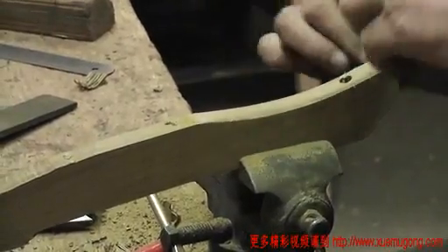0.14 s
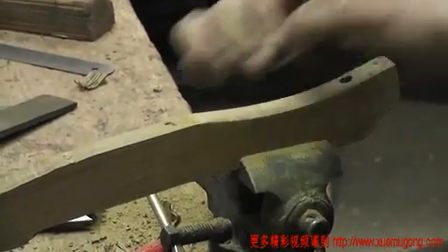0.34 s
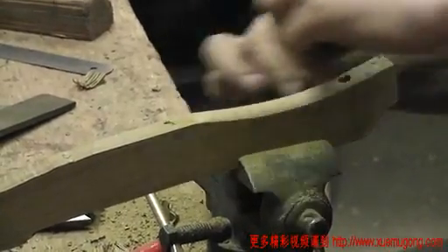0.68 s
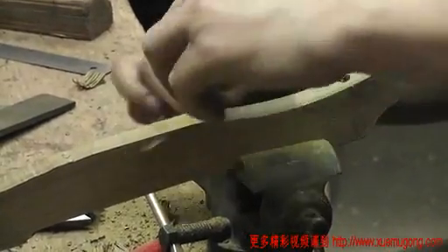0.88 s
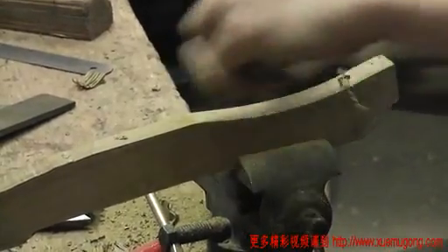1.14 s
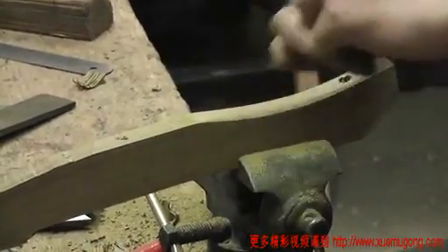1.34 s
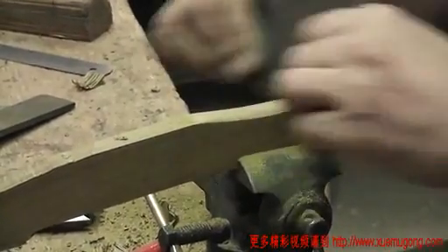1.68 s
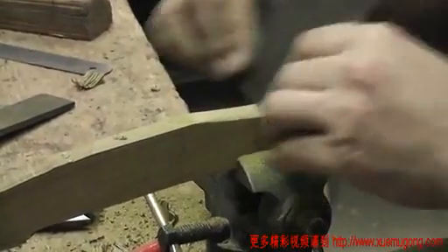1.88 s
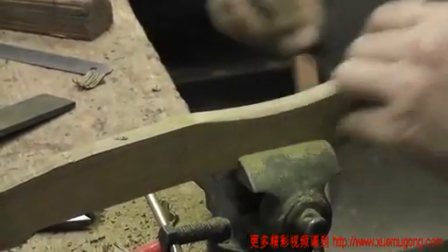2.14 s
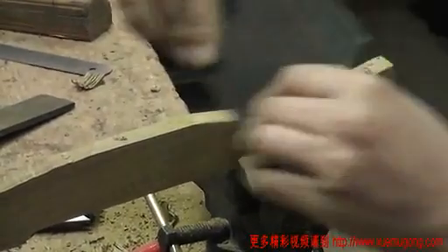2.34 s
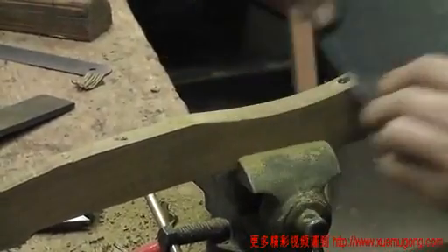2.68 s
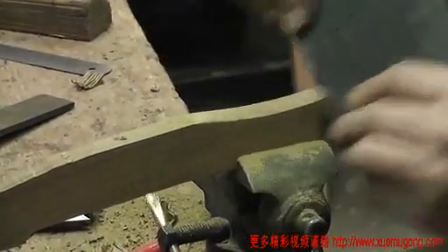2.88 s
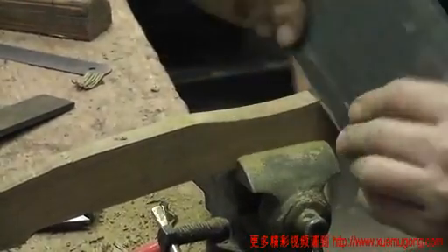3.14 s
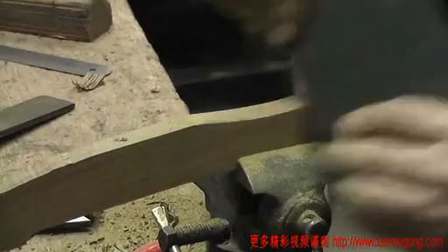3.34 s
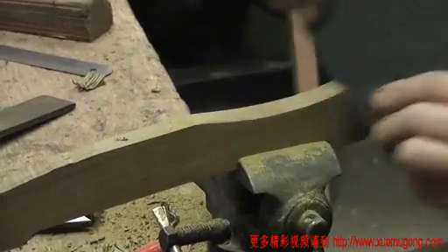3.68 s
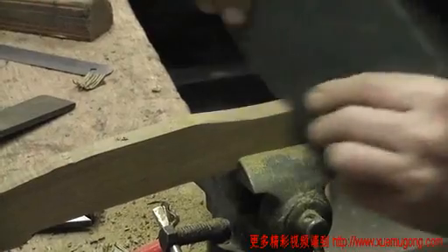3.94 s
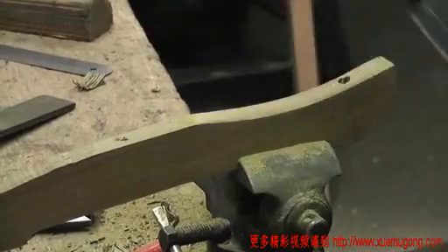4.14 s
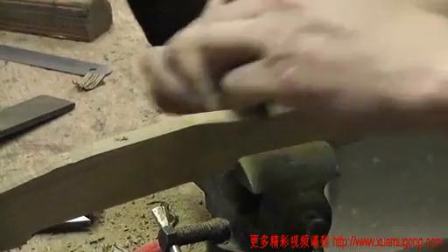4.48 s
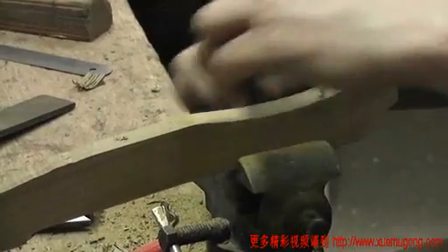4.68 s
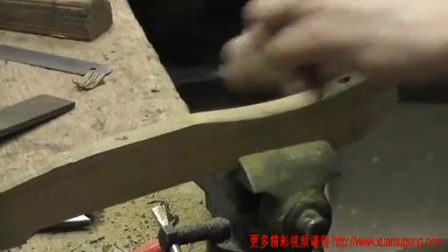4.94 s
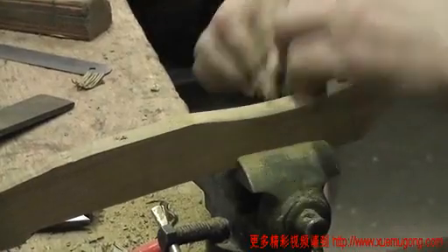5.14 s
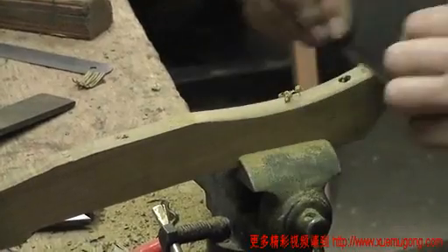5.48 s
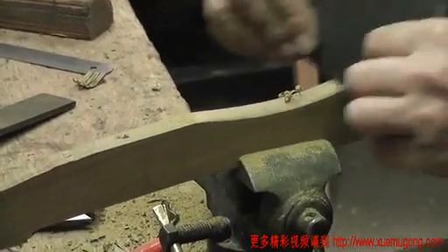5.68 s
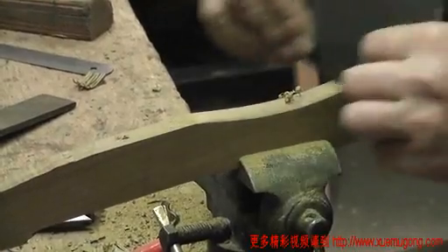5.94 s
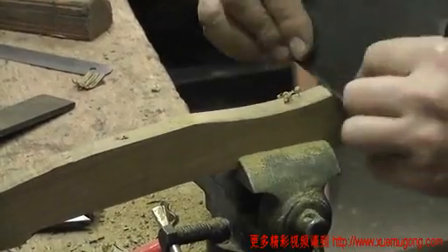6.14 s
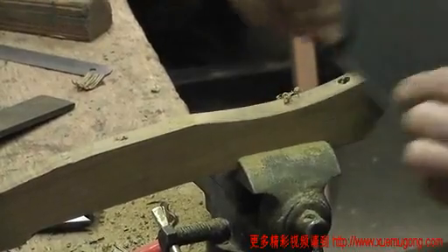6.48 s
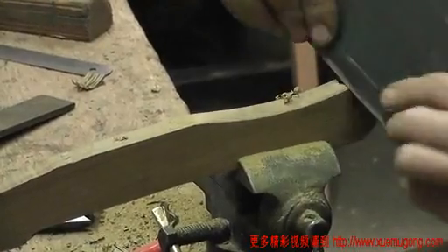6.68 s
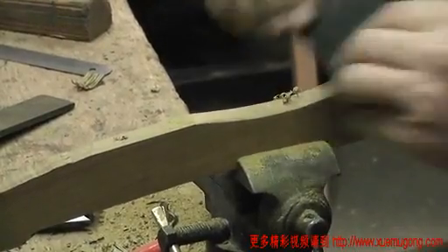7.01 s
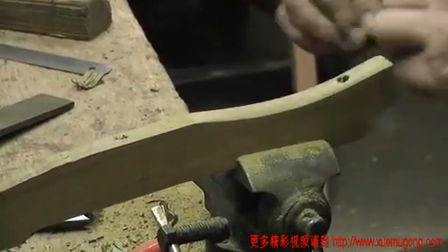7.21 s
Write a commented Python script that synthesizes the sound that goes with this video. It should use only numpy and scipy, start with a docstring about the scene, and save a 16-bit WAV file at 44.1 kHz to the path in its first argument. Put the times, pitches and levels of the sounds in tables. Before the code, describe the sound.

A steel scraper works wood in quick back-and-forth strokes: woody knocks and shuddering chatter, then dry bright hisses, close up in a small workshop.

```python
"""A steel scraper works along a curved piece of wood held in a vice, close by in a small workshop.
Pushed, the blade chatters and the wood shudders; pulled, it cuts with a dry hiss of tearing fibres.
Shaped random fibre breaks excite blade and wood modes; blows ring the wood under a noise clack.
Blade-coloured noise cracks, short pops, decaying bench sines and a noise murmur of air complete it.
The bench scatters the work to two microphones; the room briefly answers its thumps."""
import sys
import numpy as np
from scipy import signal
from scipy.fft import rfft, irfft, next_fast_len
from scipy.io import wavfile
from scipy.ndimage import uniform_filter1d, map_coordinates

SR = 44100
rng = np.random.default_rng(int(sys.argv[2]) if len(sys.argv) > 2 else 0)


def waveform_to_disk(signal):
    """Save audio, clipped to [-1, 1], as 16-bit WAV at the path in sys.argv[1]."""
    frames = np.transpose(np.atleast_2d(signal))
    scaled = np.clip(frames, -1, 1) * 32767
    samples = np.round(scaled).astype(np.int16)
    wavfile.write(sys.argv[1], SR, samples)


N = 323253  # samples

# blade pushed forward:
# start_s, rise_s, hold_s, shudder_db, chatter_db, grind_db, favoured_mode_hz
PUSH_STROKES = [ (0.0, 0.035, 0.056, -24, -30.5, -31.5, 354), (0.404, 0.0083, 0.063, -12, -22, -30.5, 280),
                (0.776, 0.019, 0.059, -15.5, -14.5, -21.5, 322),
                (1.163, 0.0029, 0.055, -16, -20.5, -33, 265), (1.567, .003, 0.071, -21, -30, -37.5, 237),
                (1.839, 0.031, 0.04, -24.5, -27.5, -27, 370), (2.118, 0.044, 0.11, -20, -24.5, -24, 353),
                (2.209, 0.021, 0.044, -15, -22, -26, 337), (2.502, 0.028, 0.073, -23.5, -31, -30, 315),
                (2.848, 0.0067, 0.022, -24.5, -35, -32, 360), (3.113, 0.003, 0.022, -12.5, -35, -30, 367),
                (3.382, 0.011, 0.12, -17.5, -26.5, -30.5, 214),
                (3.862, 0.0033, 0.063, -26, -35.5, -47, 223),
                (4.355, 0.012, 0.071, -12.5, -23.5, -31.5, 274),
                (4.722, 0.0079, 0.074, -20, -27.5, -37, 238), (5.139, 0.011, 0.027, -15, -18, -32, 390),
                (5.365, .004, 0.068, -24.5, -31, -32, 376), (5.575, 0.046, 0.039, -22.5, -34, -23.5, 400),
                (5.807, 0.06, 0.022, -17, -25, -20.5, 400), (6.039, 0.033, 0.038, -20, -31, -22.5, 390),
                (6.409, 0.0024, 0.024, -12, -29, -46, 400), ]
# blade pulled back, cutting:
# start_s, rise_s, hold_s, fade_db_per_s, hiss_db, rasp_db, rumble_db
PULL_STROKES = [ (0.083, 0.027, 0.014, 205, -29.5, -27, -32), (0.499, 0.019, 0.095, 240, -21, -25.5, -39.5),
                (.865, 0.022, 0.074, 234, -21.5, -26, -39.5), (1.218, 0.043, .1, 294, -22.5, -25.5, -38),
                (1.643, 0.0066, 0.067, 186, -21, -26.5, -37.5), (1.924, 0.041, 0.038, 187, -20, -26, -33.5),
                (2.294, 0.0053, 0.034, 175, -20, -28, -49), (2.598, 0.0059, 0.12, 260, -20, -24.5, -41.5),
                (2.9, 0.044, .033, 275, -23, -22.5, -33), (3.161, 0.0091, 0.038, 270, -24, -24, -33),
                (3.531, 0.044, 0.074, 233, -20.5, -24, -43), (3.92, 0.026, 0.09, 450, -19.5, -25.5, -34),
                (4.069, .005, 0.091, 174, -35, -36, -32.5), (4.444, 0.05, 0.078, 270, -22, -27, -38),
                (4.799, 0.045, 0.1, 203, -20.5, -25.5, -36.5), (5.189, 0.011, 0.051, 287, -21, -27, -36),
                (5.456, 0.0087, 0.038, 240, -22.5, -24.5, -33.5), (5.676, 0.017, 0.014, 205, -26, -25, -31),
                (5.906, 0.017, 0.049, 248, -24.5, -25, -31), (6.134, 0.059, 0.044, 395, -24, -22, -31),
                (6.278, .005, 0.07, 157, -35.5, -36.5, -32.5), (6.462, 0.0072, 0.058, 235, -21.5, -24, -27),
                (6.6, 0.0046, .05, 150, -34.5, -36, -32.5), (6.739, 0.019, 0.015, 254, -19.5, -24, -28),
                (6.852, .005, 0.032, 200, -34.5, -34.5, -36),
                (7.052, 0.0073, 0.069, 260, -19.5, -26, -31.5), ]
# blade landing on the wood: start_s, level_db, tick_relative_db, favoured_mode_hz
BLADE_KNOCKS = [(.389, 2.5, -8, 593), (0.766, -17, 7.5, 900), (0.774, -23, -12, 750), (1.154, 0.5, -9, 750),
                (1.191, -25, -24, 300), (1.561, -8.5, -52, 293), (1.836, -13.5, -22, 450),
                (2.22, -18, -25, 500), (2.241, -9, -8, 282), (2.498, -38, -4, 550), (2.841, -25.5, 5, 550),
                (3.103, -7.5, 2.5, 644), (3.378, -7.5, -10, 330), (3.852, -16, -8, 330),
                (4.05, -12, -21, 544), (4.344, 2.5, -16, 504), (4.373, -8, -28, 320),
                (4.718, -1.5, -32, 382), (4.752, -9.5, -25, 242), (5.132, 2.5, -17, 800),
                (5.362, -6.5, -18, 477), (6.402, 2, -8, 640), (6.42, -24, -26, 382), (6.706, 0.5, -6, 650),
                (7.028, -3.5, -7.5, 590)]
# edge snapping through a hard fibre: start_s, level_db
FIBRE_SNAPS = [(2.937, -5), (3.987, -25), (4.044, -4.5), (6.234, -4.5), (6.53, -11)]
# short low pop, opposite at the two microphones: start_s, peak_db
LOW_POPS = [(3.581, -12), (6.2355, -6)]
# hands nudging the bench: start_s, level_db, pitch_hz
BENCH_NUDGES = [(3.611, -31, 50.3), (4.1, -29, 112), (4.216, -35, 122), (6.264, -28, 143),
                (6.831, -22, 218)]
# modes of the clamped wood: mode_hz, gain_db, t60_s
WOOD_MODES = [(82.8, -3.5, 0.31), (127, -5, 0.19), (165.6, -1, 0.24), (226.9, 2, 0.1), (277, -3, 0.08),
              (337.6, -4.5, 0.26), (380.5, 1.5, 0.13), (452.7, -5.5, 0.14), (527, -4, 0.11),
              (616, 2, 0.064), (784, -20.5, 0.0097), (753, -6, 0.13), (1073, -10, 0.085), (1250, -22, 0.19)]
# modes of the hand-damped steel plate: mode_hz, width_hz, gain_db
BLADE_MODES = [(1738, 32, 1.5), (1986, 34, 4), (2167, 17, 3), (2820, 16, -0.5), (3440, 17, 7),
               (3780, 40, 1.5), (7050, 120, -27), (8500, 2100, -9), (11300, 540, -15)]
# fibre hiss spectrum: freq_hz, gain_db
HISS_SPECTRUM = [(2000, -34), (4000, -10), (5000, -5.5), (6200, -1.5), (7400, -5), (9000, -2), (10500, -4),
                 (12400, -2.5), (13500, -7.5), (15000, -14)]
# blade rasp spectrum: freq_hz, gain_db
RASP_SPECTRUM = [(400, -10.5), (900, -6.5), (1250, -4), (1600, 1), (2300, -0.5), (3000, 0), (4300, -4.5),
                 (5200, -13.5), (8000, -27)]
# bench rumble under a cutting blade: freq_hz, gain_db
RUMBLE_SPECTRUM = [(35, -34), (80, 6.5), (105, -11.5), (150, 6), (290, -6), (385, 4), (530, -4), (800, -6),
                   (1400, -23), (3000, -52)]
# hard chatter spectrum: freq_hz, gain_db
CHATTER_SPECTRUM = [(250, -35), (450, -10.5), (610, 3.5), (1050, -4.5), (1400, -22.5), (2200, -27),
                    (4000, -47)]
# back of the burr dragged over the wood: freq_hz, gain_db
GRIND_SPECTRUM = [(600, -52), (1100, 5.5), (1600, 4), (2250, 4.5), (2800, 4.5), (3400, 0), (4200, -3.5),
                  (5200, -13), (8000, -57)]
# steel clack spectrum: freq_hz, gain_db
CLACK_SPECTRUM = [(200, -29), (700, 10), (3200, 0), (5500, -9), (9000, -11.5), (15000, -20)]
# room air spectrum: freq_hz, gain_db
AIR_SPECTRUM = [(20, -41), (50, -17), (82, -3.5), (110, -2.5), (150, -0.5), (450, -2), (700, -10.5),
                (1700, -12), (5000, -22.5), (7000, -26.5), (15000, -32)]
# workshop decay: freq_hz, t60_s
ROOM_DECAY = [(150, 0.033), (1000, 0.49), (5000, 0.024), (14000, 0.9)]
# difference between the two microphones: freq_hz, side_db
SIDE_SPECTRUM = [(60, -12), (250, -14.5), (1000, -11), (2200, -19), (3800, -22), (6000, -16), (14000, -18)]

BITE_S, CUT_IN_S = 0.009, 0.015  # time for the edge to take hold: push, pull
PULL_S = 0.29  # whole pull, CUT_IN_S included
# the hand speeds up into a stroke and eases off
PULL_SWELL_DB_PER_S, PUSH_SWELL_DB_PER_S = 171, 216
HISS_SAG_DB_PER_S, RASP_SAG_DB_PER_S, RUMBLE_SAG_DB_PER_S = 35, 20, 44
# drop over a push's hold as the blade slows
SHUDDER_DROP_DB, CHATTER_DROP_DB, GRIND_DROP_DB = 5, 11.5, 11
# after a push the wood rings on while the blade falls quiet
SHUDDER_FADE_DB_PER_S, BLADE_FADE_DB_PER_S = 300, 500
RASP_LINGER, RUMBLE_LINGER = 0.79, 0.31  # fade rates as a share of the hiss's
PUSH_DRIFT_DB, PULL_DRIFT_DB, SNAP_DRIFT_DB = 2.5, 3.0, 6  # drift of the blade's colour
CLACK_DB, CLACK_T60_S = -11.5, 0.16
POP_S = 0.0012  # time scale of push and rebound
ROOM_DB = -15.5
TOP_HZ = 15050


def amp(db):
    """Decibels to gain."""
    return 10 ** (np.asarray(db) / 20)


def unit(x):
    """Scales to rms 1."""
    return x / np.sqrt(np.mean(x ** 2) + 1e-20)


def along(points, hz):
    """Reads (freq_hz, value) points on a log frequency axis."""
    point_hz, value = np.transpose(points)
    return np.interp(np.log(hz + 1), np.log(point_hz), value)


def wobble(rate_hz, size):
    """Smooth random curve with rate_hz knots a second."""
    knots = rng.standard_normal(int(size * rate_hz / SR) + 4)
    return map_coordinates(knots, [np.arange(size) * rate_hz / SR])


def filtered(x, response):
    """Multiplies the spectrum by a response of frequency."""
    n = x.shape[-1]
    padded = next_fast_len(n + SR // 16)
    spectrum = rfft(x, padded) * response(np.fft.rfftfreq(padded, 1 / SR))
    return irfft(spectrum, padded)[..., :n]


def coloured(x, spectrum):
    """Shapes x by a spectrum, at rms 1."""
    return unit(filtered(x, lambda hz: amp(along(spectrum, hz))))


def evened(x, span_s):
    """Holds x near rms 1 over each span."""
    power = np.abs(uniform_filter1d(x ** 2, int(span_s * SR)))
    return x / np.sqrt(power + 1e-9)


def high_passed(x, corner_hz):
    """Removes the sound below the corner."""
    return signal.sosfilt(signal.butter(2, corner_hz, 'high', fs=SR, output='sos'), x)


def add(track, start_s, x):
    """Mixes x into the track."""
    start = max(round(start_s * SR), 0)
    part = track[start:start + len(x)]
    part += x[:len(part)]


def stroke(t, contact_s, rise_s, hold_s, swell, sag, fade):
    """Stroke gain: the edge takes hold, swells, sags while held, fades (slopes in dB per s)."""
    db = -swell * np.maximum(rise_s - t, 0)
    db -= sag * np.clip(t - rise_s, 0, hold_s)
    db -= fade * np.maximum(t - rise_s - hold_s, 0)
    take_hold = np.clip(1 + t / contact_s, 0, 1)
    let_go = np.clip((t[-1] - t) / contact_s, 0, 1)
    return amp(db) * take_hold * let_go


def fibres(size, rate_hz, spread_db):
    """Tiny fibre breaks at random times, of random sign and uneven strength."""
    breaks = rng.random(size) < rate_hz / SR
    signs = rng.choice([-1, 1], size)
    return breaks * signs * amp(spread_db * rng.standard_normal(size))


def through_blade(x, ring_db, flex, patchy_db):
    """Plate modes, shifted by each new grip; colour drifts as the contact point travels."""
    grip = rng.standard_normal((len(BLADE_MODES), 2))
    modes = [(hz * (1 + flex * shift), width_hz, amp(db + ring_db + 2 * weight))
             for (hz, width_hz, db), (shift, weight) in zip(BLADE_MODES, grip)]

    def response(hz):
        """Direct scrape plus its resonances."""
        return 1 + sum(g * 1j * hz * w / (f * f - hz * hz + 1j * hz * w) for f, w, g in modes)

    ringing = filtered(x, response)
    z = signal.stft(np.pad(ringing, (0, 1024)), nperseg=1024)[2]
    drift = uniform_filter1d(rng.standard_normal(z.shape), size=5, axis=0)
    drift = uniform_filter1d(drift, size=7, axis=1)
    return signal.istft(z * amp(patchy_db * unit(drift)), nperseg=1024)[1][:len(x)]


def wood_ring(centre_hz, focus, detune, vary_db):
    """Wood modes after one blow; contact place and hardness favour those near centre_hz."""
    t = np.arange(SR // 5) / SR
    hz, db, t60_s = np.transpose(WOOD_MODES)[:, :, None]
    shift, weight = rng.standard_normal((2, len(WOOD_MODES), 1))
    nearness = 1 / np.sqrt(1 + (focus * (hz / centre_hz - centre_hz / hz)) ** 2)
    gain = amp(db + vary_db * weight) * nearness
    phase = rng.uniform(0, 2 * np.pi, hz.shape)  # each mode has its own path to the air
    tones = np.sin(2 * np.pi * hz * (1 + detune * shift) * t - phase)
    ring = np.sum(gain * amp(-60 * t / t60_s) * tones, axis=0)
    ring = high_passed(ring * (1 - np.exp(-t / 0.00055)), corner_hz=121)
    return ring / np.abs(ring).max()


def shaken(size, centre_hz, focus):
    """Wood modes kept ringing by small irregular slips, at a held level."""
    lead = SR // 10
    slips = fibres(size + lead, rate_hz=700, spread_db=3.0)
    ringing = signal.fftconvolve(slips, wood_ring(centre_hz, focus, detune=0.0062, vary_db=3.0))
    return evened(ringing[lead:lead + size], span_s=0.0262)


def pushes():
    """Against its burr the blade sticks and slips: chatter while fast, wood shudder as it slows."""
    out, n = np.zeros(N), SR // 5
    t = np.arange(n) / SR - BITE_S
    for start_s, rise_s, hold_s, shudder_db, chatter_db, grind_db, mode_hz in PUSH_STROKES:
        motion = (t, BITE_S, rise_s, hold_s, PUSH_SWELL_DB_PER_S)
        shudder = amp(shudder_db) * stroke(*motion, SHUDDER_DROP_DB / hold_s, SHUDDER_FADE_DB_PER_S)
        chatter = amp(chatter_db) * stroke(*motion, CHATTER_DROP_DB / hold_s, BLADE_FADE_DB_PER_S)
        grind = amp(grind_db) * stroke(*motion, GRIND_DROP_DB / hold_s, BLADE_FADE_DB_PER_S)
        hiss = amp(-12.0) * grind ** 0.64  # more pressure adds grind faster than hiss
        breaks = fibres(n, rate_hz=420, spread_db=4.0)
        judder = evened(coloured(breaks, CHATTER_SPECTRUM), span_s=0.0145)
        wood = shudder * shaken(n, mode_hz, focus=4.4) + chatter * judder
        grit = fibres(n, rate_hz=14000, spread_db=2.5) * amp(1.7 * wobble(460, n))
        steel = through_blade(grit, ring_db=1, flex=0.0084, patchy_db=PUSH_DRIFT_DB)
        scrape = grind * coloured(steel, GRIND_SPECTRUM) + hiss * coloured(steel, HISS_SPECTRUM)
        add(out, start_s - BITE_S, wood + scrape)
    return out


def bench_scatter(x):
    """Reflections off bench and tools reach the two microphones differently."""
    t = np.arange(SR // 40) / SR
    scatter = rng.standard_normal(len(t)) * amp(-60 * t / 0.06) * (t > 0.001)
    reflected = signal.fftconvolve(x, scatter / np.linalg.norm(scatter))[:N]
    side = filtered(reflected, lambda hz: amp(along(SIDE_SPECTRUM, hz)))
    return np.array([side, -side])


def workshop(x):
    """Short diffuse noise tail, different at each microphone, decaying by frequency."""
    hz, t, z = signal.stft(rng.standard_normal((2, SR // 2)), SR, nperseg=256)
    decay = amp(-60 * t / along(ROOM_DECAY, hz)[:, None])
    tail = signal.istft(z * decay, SR, nperseg=256)[1]
    delayed = np.pad(x, (SR // 300, 0))[None]
    return signal.fftconvolve(delayed, tail / np.linalg.norm(tail[0]), axes=1)[:, :N]


def room_tone():
    """Low steady murmur of air: shared noise plus noise opposite at the microphones."""
    mid = coloured(rng.standard_normal(N), AIR_SPECTRUM)
    side_spectrum = [(20, -12), (80, 5), (200, 13), (600, 17), (2000, 8), (15000, -94)]  # freq_hz, gain_db
    side = coloured(rng.standard_normal(N), side_spectrum)
    return amp(-41.5) * mid + amp(-51.0) * side * np.array([[1], [-1]])


def pulls():
    """The burr cuts: countless fibres tear, hiss, ring the blade and shake the wood."""
    out, n = np.zeros(N), round(PULL_S * SR)
    t = np.arange(n) / SR - CUT_IN_S
    for start_s, rise_s, hold_s, fade, hiss_db, rasp_db, rumble_db in PULL_STROKES:
        motion = (t, CUT_IN_S, rise_s, hold_s, PULL_SWELL_DB_PER_S)
        hiss = amp(hiss_db) * stroke(*motion, HISS_SAG_DB_PER_S, fade)
        rasp = amp(rasp_db) * stroke(*motion, RASP_SAG_DB_PER_S, RASP_LINGER * fade)
        rumble = amp(rumble_db) * stroke(*motion, RUMBLE_SAG_DB_PER_S, RUMBLE_LINGER * fade)
        unevenness_db = 1.1 * wobble(606.4, n) + 0.29 * wobble(79, n)
        tearing = fibres(n, rate_hz=24000, spread_db=1.0) * amp(unevenness_db)
        bright = through_blade(tearing, ring_db=4, flex=0.0026, patchy_db=PULL_DRIFT_DB)
        plate = through_blade(tearing, ring_db=0.0, flex=0.0037, patchy_db=PULL_DRIFT_DB)
        fizz = coloured(bright, HISS_SPECTRUM)
        steel = coloured(plate, RASP_SPECTRUM)
        breaks = fibres(n, rate_hz=1500, spread_db=3.5)
        bench = evened(coloured(breaks, RUMBLE_SPECTRUM), span_s=0.04)
        body = bench + amp(-3.5) * shaken(n, centre_hz=368, focus=0.58)
        add(out, start_s - CUT_IN_S, hiss * fizz + rasp * steel + rumble * body)
    return out


def knocks():
    """Each landing thumps the wood's modes and clacks the steel as decaying noise."""
    out, t = np.zeros(N), np.arange(SR // 5) / SR
    for start_s, level_db, tick_db, mode_hz in BLADE_KNOCKS:
        clack = coloured(rng.standard_normal(len(t)), CLACK_SPECTRUM) * amp(-60 * t / CLACK_T60_S)
        thump = wood_ring(mode_hz, focus=0.96, detune=0.017, vary_db=0.0)
        add(out, start_s, amp(level_db - 5.0) * thump + amp(level_db + tick_db + CLACK_DB) * clack)
    return out


def snaps():
    """Hard fibres give way with a short bright crack: noise through a strongly ringing blade."""
    out, t = np.zeros(N), np.arange(SR // 10) / SR
    for start_s, level_db in FIBRE_SNAPS:
        burst = rng.standard_normal(len(t))
        crack = unit(through_blade(burst, ring_db=29, flex=0.013, patchy_db=SNAP_DRIFT_DB))
        add(out, start_s, amp(level_db - 60 * t / 0.06) * crack / np.abs(crack).max())
    return out


def pops():
    """One push of pressure and its rebound, opposite at the microphones."""
    out, u = np.zeros(N), np.arange(SR // 20) / SR / POP_S
    shape = u * (2 - u) * np.exp(-u)
    for start_s, peak_db in LOW_POPS:
        add(out, start_s, amp(peak_db) * shape / shape.max())
    return np.array([out, -out])


def nudges():
    """Soft dull bumps of the bench: low sines that swell and decay."""
    out, t = np.zeros(N), np.arange(SR // 4) / SR
    swell = t / 0.0072
    for start_s, level_db, pitch_hz in BENCH_NUDGES:
        bump = swell * np.exp(1 - swell) * np.sin(2 * np.pi * pitch_hz * t)
        add(out, start_s, amp(level_db) * bump)
    return out


def scene():
    """Work almost central; its thumps carry into the room."""
    thumps = knocks() + pushes() + nudges()
    work = thumps + pulls() + snaps()
    direct = work * amp([[0.15], [-0.15]])
    room = amp(ROOM_DB) * workshop(thumps)
    return direct + bench_scatter(work) + room + room_tone() + pops()


def record(dry):
    """Hollows one narrow band, clips at full scale and limits the band."""
    hollowed = filtered(dry, lambda hz: amp(-9 * np.exp(-((hz - 2570) / 80) ** 2)))
    return filtered(np.clip(hollowed, -1, 1), lambda hz: hz < TOP_HZ)


dry = scene()
out = record(dry)
waveform_to_disk(out)
```